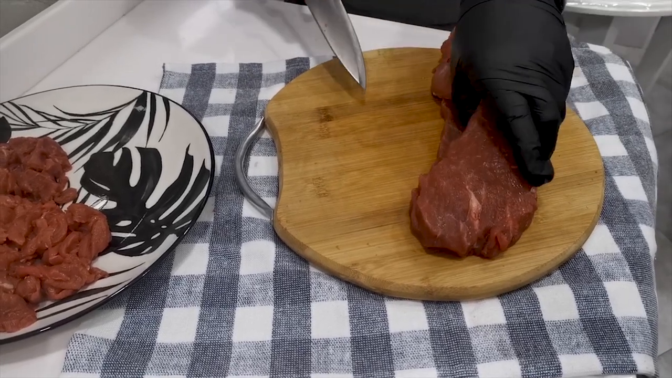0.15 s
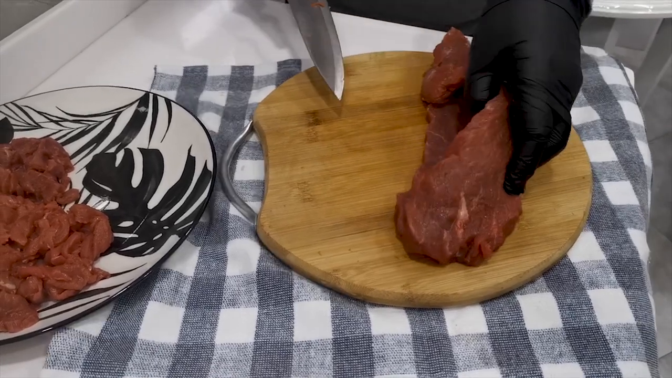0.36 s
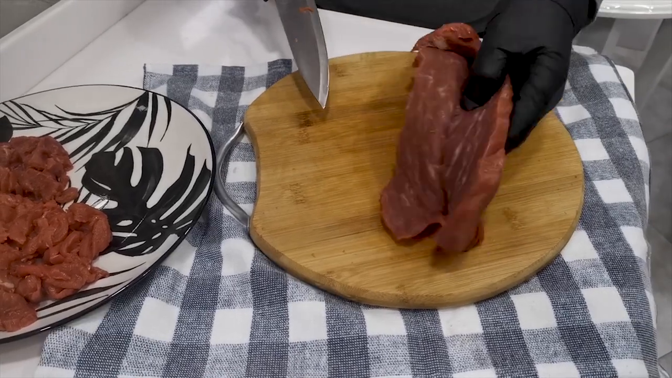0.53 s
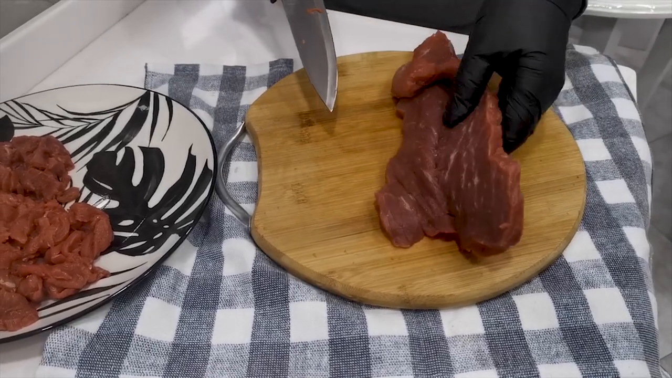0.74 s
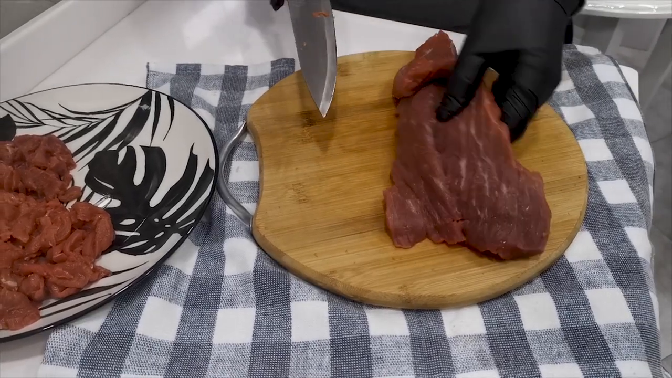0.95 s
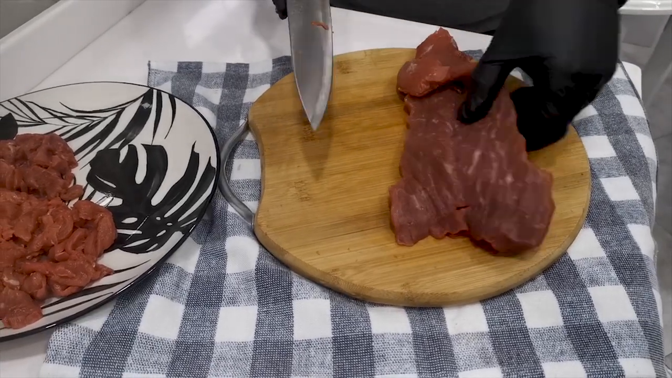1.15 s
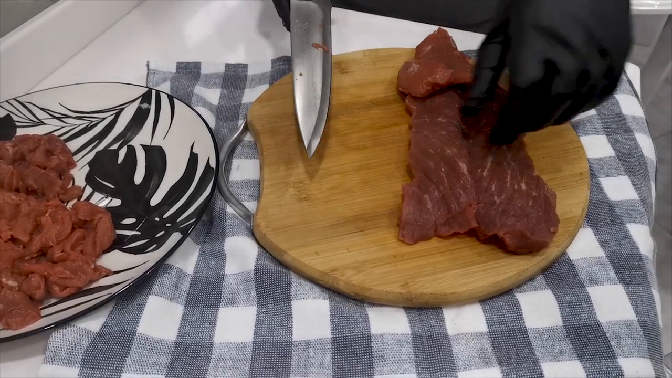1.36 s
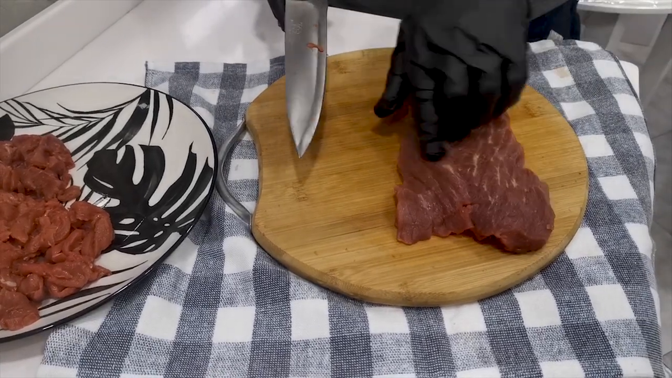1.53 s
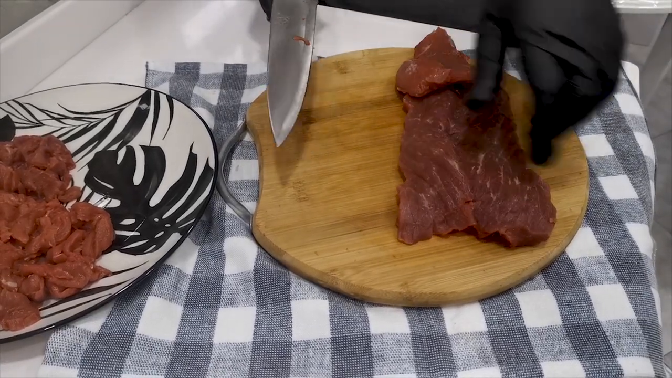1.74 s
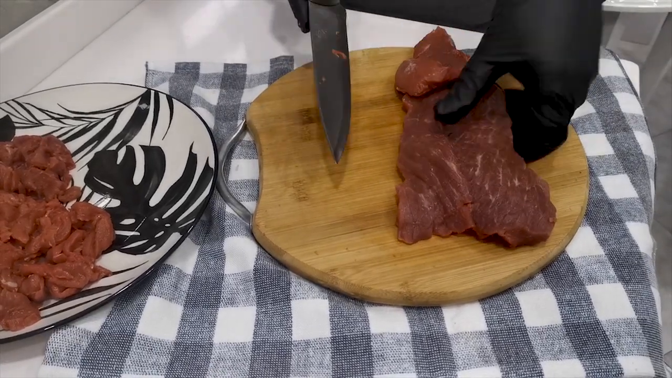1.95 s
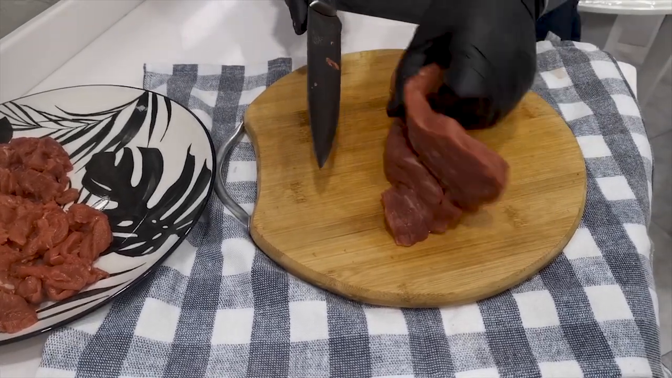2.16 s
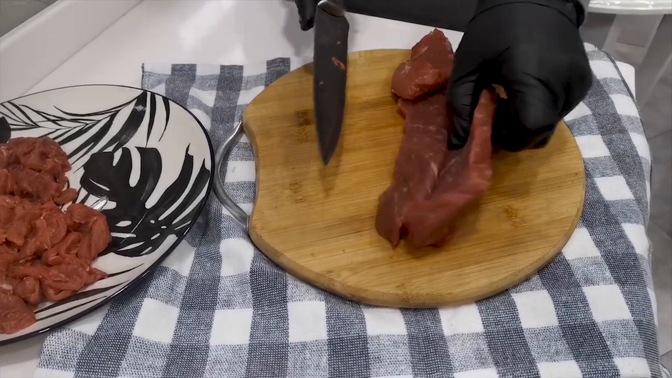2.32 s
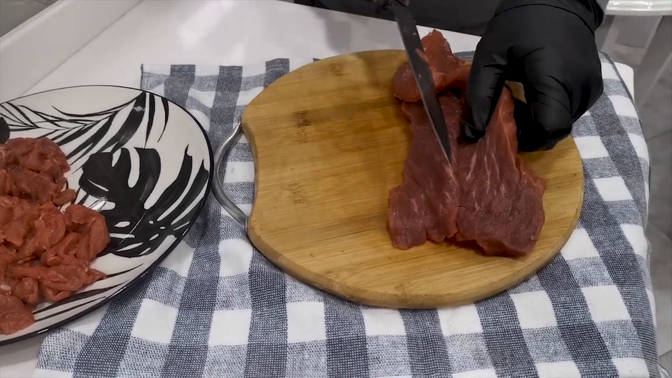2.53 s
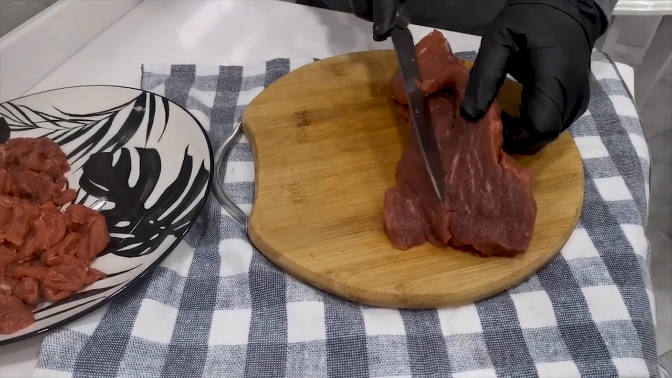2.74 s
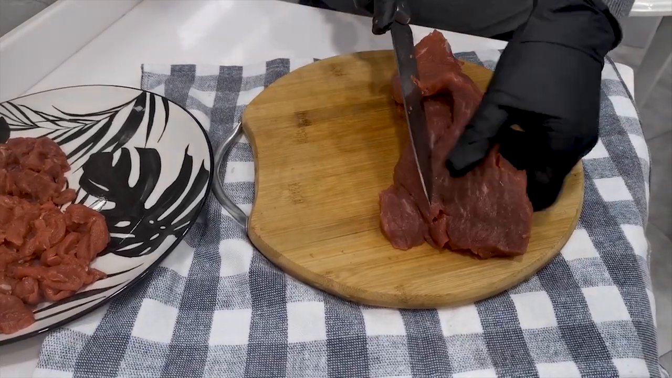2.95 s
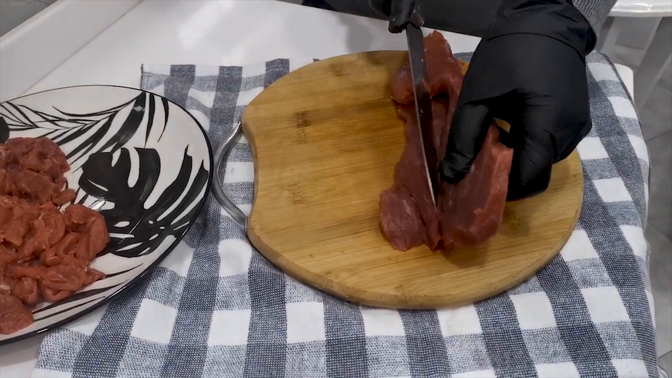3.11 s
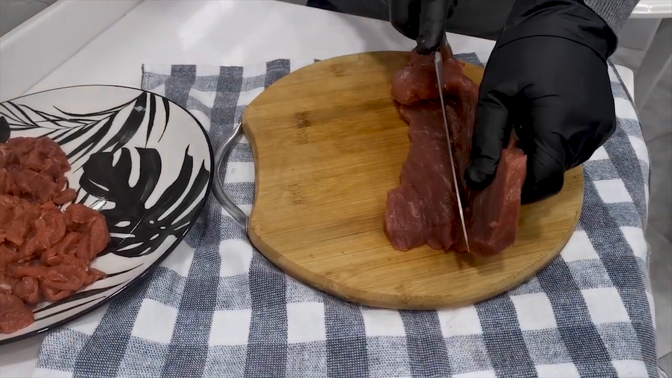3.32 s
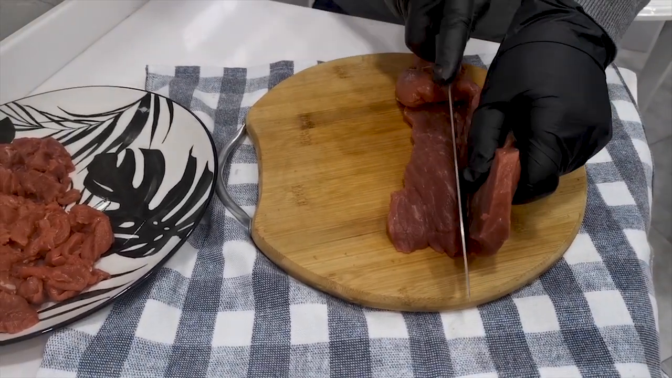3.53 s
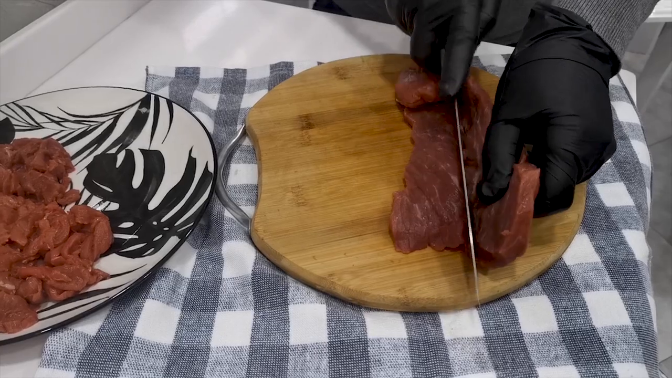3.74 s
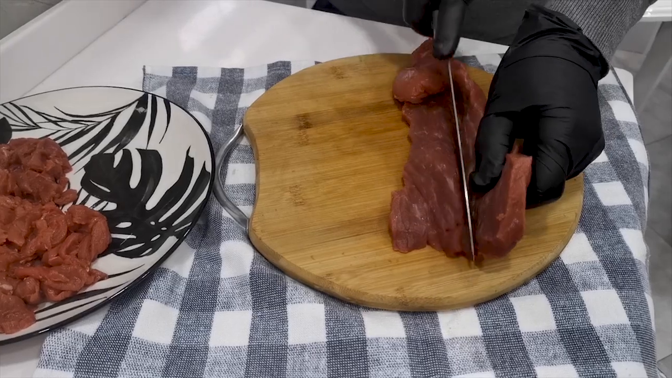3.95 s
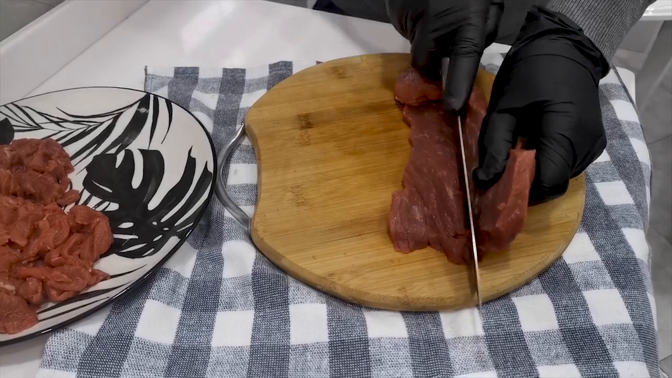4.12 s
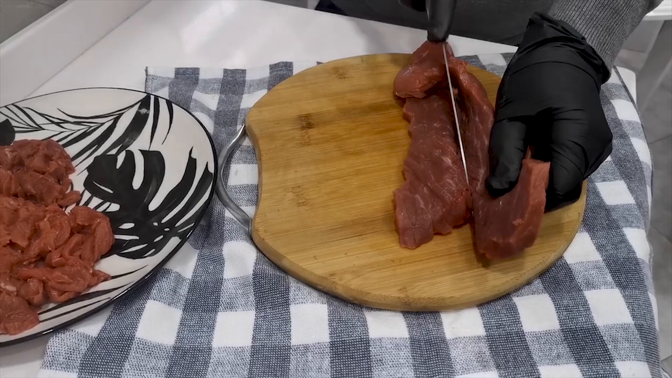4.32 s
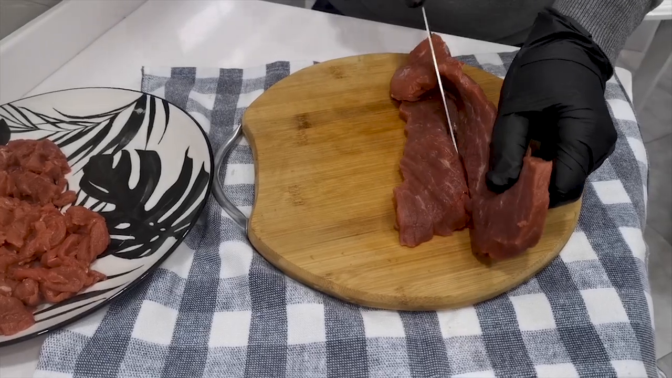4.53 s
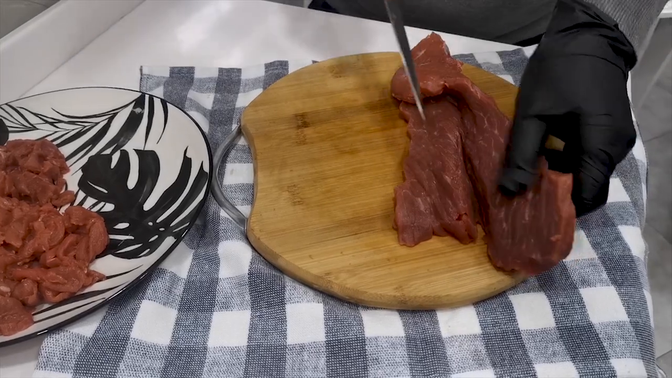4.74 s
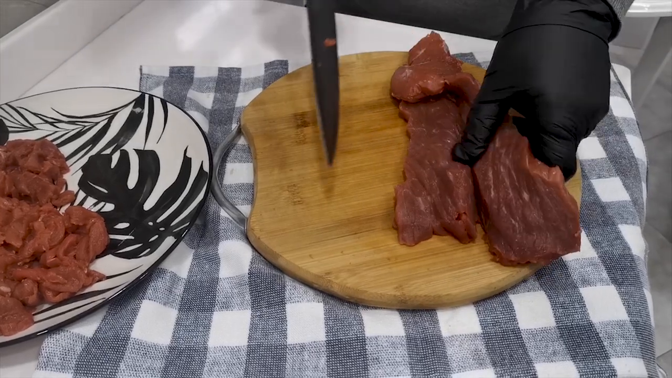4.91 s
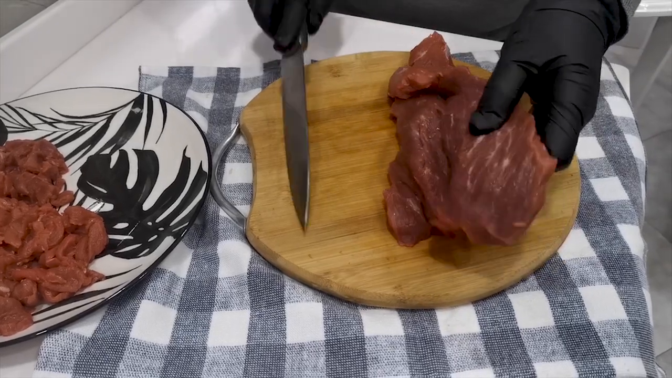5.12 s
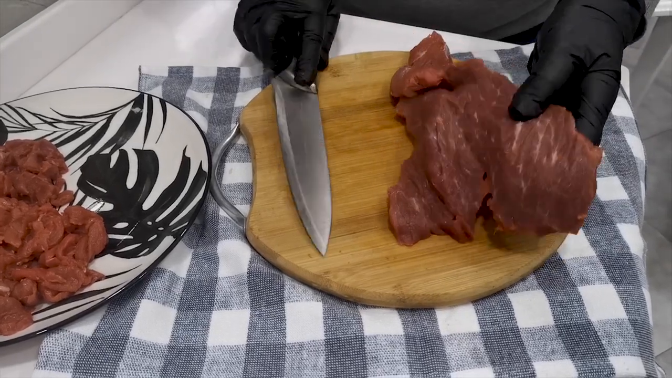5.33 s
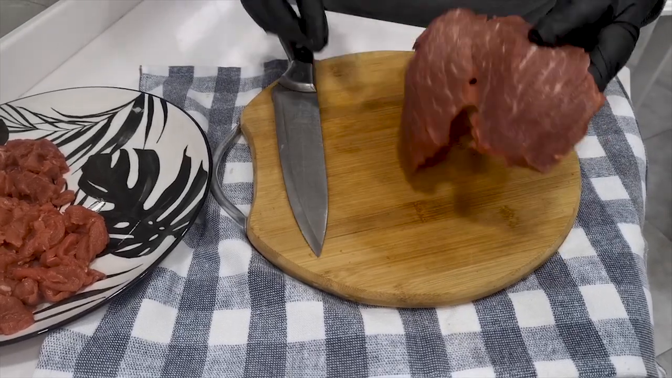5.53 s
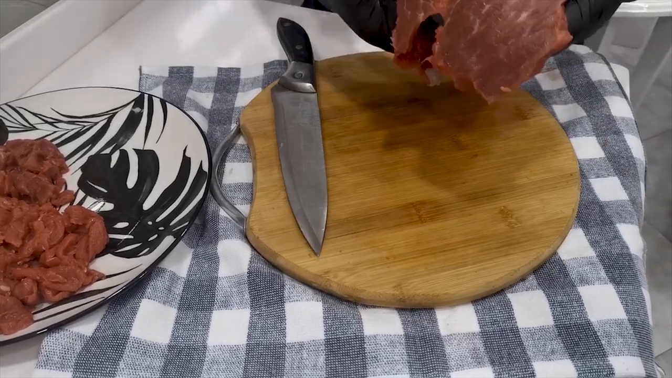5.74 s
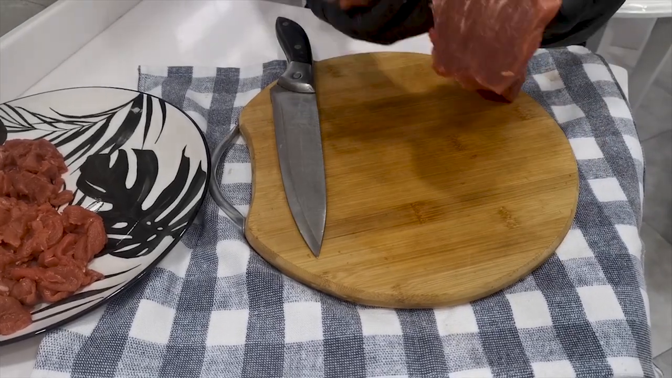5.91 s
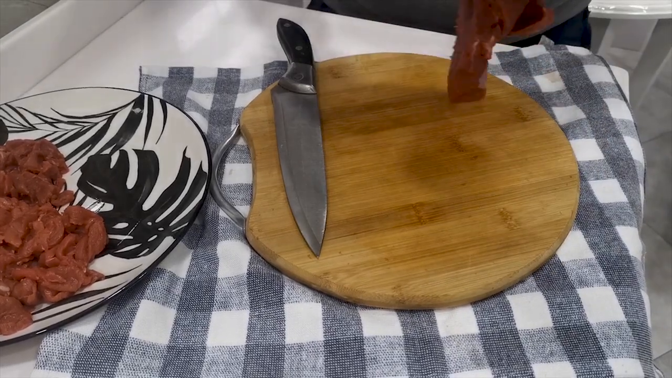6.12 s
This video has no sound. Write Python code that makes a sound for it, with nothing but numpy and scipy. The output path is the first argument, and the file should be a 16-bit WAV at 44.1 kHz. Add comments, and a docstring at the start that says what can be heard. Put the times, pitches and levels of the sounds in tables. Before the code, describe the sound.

A small, lightly echoing kitchen, heard close up in stereo over a very faint low hum and a distant blurred appliance drone. From 0 to 2.3 seconds gloved hands turn a slab of raw meat: wet squelches, tiny sticky pops and crackly glove rustle, with soft dull bumps on the board near 0.5, 0.7 and 1.9. It thins into a lull, broken by a brief moist squeeze around 3.0. Two very soft, airy blade strokes pass near 3.6 and 3.9, then the slab slaps down dully at 4.15, with a lighter bump at 4.3. Sticky peeling pops gather around 4.9 to 5.15. At 5.24 the blade hits the wood with a loud, sharp clack and short metallic ring; at 5.42 the knife lands with a cluster of hard knocks, rattling and settling by 5.7. Quiet glove rustle and wet squelches continue to about 6.2.

```python
"""Gloved hands turn and slice a slab of raw meat on a wooden board, over a faint kitchen hum and a distant drone.
First wet flesh squelches and pops (tiny damped sines) while the gloves rustle and the slab rubs (shaped noise).
After a lull the blade draws through the meat in two soft strokes of noise, and the slab slaps down.
Then the blade taps the board, and the knife is laid down, rocks (fading noise) and settles.
Blows are sums of fading tones from board and blade with an echo of the room; the counter booms below."""
import sys
import numpy as np
from scipy import signal
from scipy.fft import rfft, irfft, next_fast_len
from scipy.io import wavfile
from scipy.ndimage import uniform_filter1d, map_coordinates

SR = 44100
rng = np.random.default_rng(int(sys.argv[2]) if len(sys.argv) > 2 else 0)


def unload_audio(sound):
    """Save the sound as a 16-bit wav file, at the path given as the first command line argument."""
    columns = np.transpose(np.atleast_2d(sound))
    # keep every value between -1 and 1, then stretch to whole-number steps
    steps = np.round(np.clip(columns, -1, 1) * 32767)
    wavfile.write(sys.argv[1], SR, steps.astype(np.int16))


N = 272097  # length in samples, about 6.2 seconds

# Faint kitchen hum. Each row: frequency in Hz, relative level in dB.
HUM = [(15, -31.5), (25, -3), (101, -1), (231, -8.5), (397, -8), (463, -11), (555, -5), (797, -19.5),
       (979, -21.5), (1060, -23.5), (2750, -18), (4270, -27.5), (6620, -25.5), (12000, -55), (15600, -80),
       (22000, -120)]
# How long the kitchen echoes. Each row: frequency in Hz, time to fall by 60 dB in seconds.
KITCHEN_FADE = [(100, 0.93), (500, 0.66), (1500, 0.36), (3000, 0.5), (8000, 0.54)]
# Thuds into the counter. Each row: start in seconds, level in dB, favoured pitch in Hz.
THUDS = [(0.231, -61, 64), (0.477, -58, 64), (0.666, -44, 110), (1.115, -60, 70), (1.314, -49, 71),
         (1.906, -42, 85), (4.143, -45, 72), (4.315, -43, 78), (4.838, -57, 85), (5.239, -42, 69),
         (5.42, -39.5, 80), (5.501, -42, 90), (5.68, -55, 70), (5.989, -54.5, 32), (6.079, -50.5, 33)]
# Tones of the counter. Each row: frequency in Hz, relative level in dB, time to fall by 60 dB in seconds.
COUNTER_TONES = [(32, -2, .5), (66, -2, .25), (77, -1, .36), (95, -9, .25), (130, 3.5, .46), (175, -3, .4)]
# Chatter of the knife on the wood. Each row: frequency in Hz, relative level in dB.
RATTLE = [(40, -40), (150, -9), (300, -7.5), (600, 0), (780, -2.5), (1000, -0.5), (1450, -5), (1900, -8),
          (2300, -5.5), (2740, -5.5), (3300, -27), (4400, -42), (7000, -38), (10000, -79)]
# Blows on the board. Each row: start in seconds, level in dB, favoured pitch in Hz,
# narrowness in dB lost per squared octave, blade ring in dB added to the level, room echo in dB against the knock.
BLOWS = [(0.478, -38.5, 1010, 8, -24, 3), (0.663, -29.5, 460, 22, -40, -3.5),
         (1.907, -28, 374, 16, -40, -6), (1.922, -35, 397, 12, -30, -8), (4.145, -22.5, 470, 5, -42, 0),
         (4.1465, -27.5, 820, 23, -40, -3), (4.151, -45, 370, 14, -43, -2),
         (4.284, -35.5, 850, 21, -40, -3), (5.2391, -6, 1100, 3.5, -5.5, -5),
         (5.294, -31, 3000, 7, -28.5, 5), (5.4157, -8, 1970, 3, -42, -8), (5.432, -19.5, 2000, 1, -20, -5),
         (5.4677, -15.5, 2200, 3, -33.5, -9), (5.4829, -20, 1510, 7, -18, -11),
         (5.49, -24, 448, 4.5, -28, -4.5), (5.519, -32, 805, 4, -27, -15), (5.647, -31, 1880, 21, -26, -9)]
# Tones of the wooden board. Each row: frequency in Hz, relative level in dB, time to fall by 60 dB in seconds.
BOARD_TONES = [(306, -11, 0.026), (384, -4.5, 0.041), (467, -7, 0.05), (547, 1.5, 0.038), (654, -8, 0.024),
               (794, -2, 0.016), (942, -4.5, 0.024), (1038, -1.5, 0.015), (1477, -20.5, 0.03),
               (1852, 3, 0.02), (2150, 3.5, .012), (2680, 2, 0.019), (3160, -19, 0.004), (3690, -15, 0.028),
               (4500, -16.5, 0.013), (5800, -32.5, .008), (7000, -34, 0.0098)]
# Tones of the blade. Each row: frequency in Hz, relative level in dB, time to fall by 60 dB in seconds.
BLADE_TONES = [(524, -11, .6), (602, -16, 0.96), (1040, -11, 0.53), (1140, -11, 0.43), (1121, -5, 0.52),
               (1194, -8, 0.22), (1250, -16, 0.51), (1345, -16, 0.52), (1405, -17, 0.26), (1900, -24.5, .2),
               (2700, -17, 0.34)]
# Overall tone of the blows: strongest in the middle, weak below 120 Hz and above 6500 Hz.
# Each row: frequency in Hz, gain in dB.
BLOW_TONE = [(40, -50), (120, -18.5), (260, -6), (400, -1), (4000, 3.5), (6500, -8), (10000, -35),
             (15000, -80)]
# Knife strokes. Each row: time of full speed in seconds, seconds to climb 20 dB, seconds held,
# blade drag in dB, edge hiss in dB.
STROKES = [(3.6, .2, .14, -72, -78), (3.875, .06, .08, -85, -75)]
# Rasp of the blade in the fibres. Each row: frequency in Hz, relative level in dB.
DRAG = [(1200, -60), (1800, -23), (2500, 0), (3300, 7), (4200, 4), (4900, -30.5), (6500, -70)]
# Thin hiss of the edge. Each row: frequency in Hz, relative level in dB.
EDGE = [(4000, -60), (5600, -20), (6400, -15), (6700, -1.5), (7000, -6), (7600, -6), (8400, -20),
        (12500, -50), (15000, -80)]
# Sticky pops. Each row: start in seconds, tick level in dB, pitch in Hz, treble snap level in dB.
POPS = [(0.0284, -46, 1880, -55), (0.1261, -47, 2030, -64), (0.1974, -52, 1530, -61),
        (0.2094, -42, 2890, -55), (0.2354, -46, 2900, -56), (0.2423, -43, 2080, -60),
        (0.2783, -46, 2800, -62), (0.3284, -47, 2950, -58), (0.4834, -38, 1530, -56),
        (0.5634, -52, 1550, -53), (0.6115, -50, 1950, -67), (0.6305, -43, 1830, -57),
        (0.6674, -38, 2040, -57), (0.7344, -46, 1530, -53), (0.7652, -45, 1870, -67),
        (0.9318, -42, 1740, -72), (0.9453, -40, 1200, -66), (1.1074, -41, 1840, -62),
        (1.1464, -36, 2220, -58), (1.1598, -32, 3230, -59), (1.1927, -39, 3110, -58),
        (1.495, -41, 2730, -51), (1.5085, -35, 2730, -54), (1.5599, -42, 2730, -52),
        (1.6053, -41, 1670, -58), (1.6661, -32, 1720, -47), (1.6984, -48, 1800, -46),
        (1.7304, -49, 2020, -52), (1.8282, -50, 2810, -51), (2.0657, -42, 2750, -61),
        (2.0981, -38, 1890, -56), (2.1554, -42, 2120, -50), (2.1949, -39, 2130, -44),
        (2.2593, -43, 1690, -60), (2.3486, -45, 2220, -71), (2.4723, -54, 2060, -71),
        (2.4064, -60, 2080, -58), (2.5284, -63, 1620, -62), (2.6419, -60, 1960, -62),
        (2.7424, -57, 2770, -62), (2.821, -49, 2620, -64), (2.9444, -49, 2090, -62),
        (3.022, -41, 1400, -49), (3.2311, -57, 1980, -67), (3.477, -54, 3070, -64),
        (3.7509, -51, 3320, -72), (4.0741, -48, 1950, -65), (4.1294, -50, 1990, -56),
        (4.6887, -50, 2050, -68), (4.7686, -47, 2060, -63), (4.8254, -48, 2310, -60),
        (4.8574, -48, 2110, -57), (4.8988, -32, 2080, -53), (4.9144, -38, 2160, -55),
        (5.0254, -45, 1670, -63), (5.1487, -38, 1880, -61), (5.6694, -47, 1620, -58),
        (5.7688, -48, 2240, -52), (5.8274, -59, 2620, -58), (5.9848, -51, 2140, -50)]
# Squeezes of the hands. Each row: peak time in seconds, seconds to climb 20 dB, seconds to fall by 60 dB,
# squelch in dB, favoured pocket pitch in Hz, glove rustle in dB, board rub in dB.
SQUEEZES = [(0.041, 0.077, 0.54, -60.5, 2780.0, -61.5, -62.0),
            (0.21, 0.032, 0.42, -59.0, 1310.0, -66.5, -62.0),
            (0.333, 0.242, 0.41, -56.5, 3490.0, -62.0, -76.0),
            (0.418, 0.855, 0.27, -66.5, 1870.0, -90.0, -76.0),
            (0.481, 0.025, 0.33, -52.5, 2540.0, -59.0, -55.0),
            (0.512, 0.051, 0.43, -53.0, 1110.0, -59.0, -64.0),
            (0.666, 0.06, 0.47, -51.5, 1820.0, -59.0, -76.0),
            (0.82, 0.079, 0.18, -58.0, 1870.0, -75.5, -76.0),
            (0.956, 0.033, 0.28, -50.5, 990.0, -86.0, -76.0),
            (1.002, 0.395, 0.22, -59.5, 1810.0, -70.5, -76.0),
            (1.119, 0.031, 0.46, -52.0, 1830.0, -63.5, -76.0),
            (1.142, 0.036, 0.42, -48.0, 3430.0, -75.0, -61.0),
            (1.193, 0.103, 0.48, -54.5, 1320.0, -57.0, -76.0),
            (1.259, 0.162, 0.28, -55.0, 2970.0, -63.5, -76.0),
            (1.314, 0.031, 0.21, -57.0, 1050.0, -51.0, -66.0),
            (1.5, 0.017, 0.27, -52.0, 1830.0, -55.0, -63.0),
            (1.57, 0.037, 0.63, -56.5, 1970.0, -60.5, -76.0),
            (1.667, 0.064, 0.5, -55.5, 1650.0, -59.5, -76.0),
            (1.734, 0.027, 1.44, -68.0, 2490.0, -64.5, -76.0),
            (1.909, 0.013, 0.42, -56.0, 1610.0, -53.5, -76.0),
            (2.029, 0.081, 0.7, -53.0, 2380.0, -62.5, -65.0),
            (2.142, 0.113, 0.22, -49.5, 1570.0, -82.5, -76.0),
            (2.18, 0.184, 0.63, -61.5, 2180.0, -60.0, -76.0),
            (2.254, 0.018, 1.13, -66.5, 1600.0, -68.5, -76.0),
            (2.342, 0.015, 0.28, -67.0, 2030.0, -90.0, -76.0),
            (2.768, 0.044, 0.39, -72.0, 2010.0, -70.5, -76.0),
            (2.826, 0.022, 1.23, -62.5, 2680.0, -90.0, -76.0),
            (2.869, 0.06, 0.43, -56.0, 1610.0, -62.0, -68.0),
            (3.035, 0.062, 0.45, -53.0, 1510.0, -60.0, -76.0),
            (3.235, 0.016, 1.43, -74.0, 1660.0, -80.0, -76.0),
            (3.483, 0.045, 0.17, -76.0, 1580.0, -74.0, -76.0),
            (3.627, 0.191, 0.62, -68.5, 2250.0, -70.0, -76.0),
            (3.885, 0.048, 0.23, -76.5, 1400.0, -65.5, -76.0),
            (4.079, 0.015, 0.65, -63.0, 1750.0, -64.5, -76.0),
            (4.157, 0.033, 0.25, -48.5, 1510.0, -58.0, -50.0),
            (4.294, 0.117, 0.59, -54.5, 1940.0, -61.0, -55.0),
            (4.44, 0.202, 0.4, -63.0, 3320.0, -67.0, -64.0),
            (4.674, 0.062, 0.8, -70.5, 1750.0, -71.5, -76.0),
            (4.748, 0.054, 4.61, -65.0, 2220.0, -68.0, -76.0),
            (4.915, 0.07, 0.38, -51.5, 2370.0, -58.0, -69.0),
            (5.076, 0.563, 0.22, -59.5, 1520.0, -70.5, -76.0),
            (5.152, 0.17, 0.48, -51.0, 1360.0, -63.5, -66.0),
            (5.292, 0.158, 0.49, -87.5, 1990.0, -61.5, -76.0),
            (5.44, 0.043, 0.36, -85.0, 2050.0, -58.0, -76.0),
            (5.713, 0.155, 0.41, -77.5, 2220.0, -62.5, -57.0),
            (5.776, 0.036, 0.17, -71.5, 2320.0, -58.5, -70.0),
            (5.899, 0.169, 0.35, -64.5, 1090.0, -67.5, -76.0),
            (5.991, 0.051, 0.66, -59.5, 1990.0, -65.0, -76.0),
            (6.055, 0.126, 0.17, -55.5, 2250.0, -51.5, -69.0),
            (6.169, 0.993, 2.0, -69.5, 3720.0, -73.5, -76.0)]
# Air pockets in the wet flesh. Each row: pitch in Hz, scatter of pitch (natural log), cycles of ring.
POCKETS = [(1346, 0.15, 3.6), (1983, 0.11, 6.5), (2790, 0.12, 9.7)]
# Tone of wet flesh. Each row: frequency in Hz, relative level in dB.
WET = [(500, -60), (900, -14), (1200, -9), (3200, 6), (3800, 2.5), (4600, -16), (8000, -60)]
# Tone of the gloves. Each row: frequency in Hz, relative level in dB.
GLOVE = [(2350, -12), (4000, -4), (4580, -7.5), (5210, -2), (6800, -0.5), (7650, -5.5), (9750, -21),
         (13200, -29), (15400, -53)]
# Tone of the slab rubbing on the board. Each row: frequency in Hz, relative level in dB.
RUB = [(88, -22), (150, -4), (377, 3), (642, -10), (823, -7.5), (900, -5.5), (1170, -3), (1980, -120)]
# Two microphone ports. Each row: frequency in Hz, share of the side in step with the mid,
# share a quarter cycle ahead, unrelated side in dB.
PORTS = [(60.0, 0.28, -0.02, -15), (140.0, 0.29, -0.03, -17), (280.0, 0.22, -0.11, -14),
         (570.0, 0.17, -0.06, -16), (1060.0, 0.18, -0.06, -12), (1670.0, -0.04, -0.19, -10),
         (2370.0, -0.24, -0.05, -10), (3170.0, -0.3, -0.03, -7), (3980.0, -0.02, 0.79, 3),
         (4920.0, 1.26, 0.29, 0), (6200.0, 0.65, 0.02, -2), (7940.0, 0.65, -0.03, 0),
         (10390.0, 0.07, -0.07, -1), (13420.0, 0.1, 0.01, -4)]

HUM_DB = -69.5  # the hum wavers around this
ROCK_START_S, ROCK_STILL_S = 5.42, 5.67  # the knife lands flat, and lies still
ROCK_DB, ROCK_LANDING_S = -31, .002
ROCK_FADE_DB_PER_S, STILL_FADE_DB_PER_S = 85, 280  # the second adds to the first
STROKE_T60_S = .2  # time for a stroke to fall by 60 dB
FAINT_POP_DB, FAINT_POP_HZ, FAINT_TREBLE_DB = -60, 2100, -68  # centres of the random small pops
POCKET_CHOICE_DB = 16  # loss per squared octave between a pocket and the pitch of the squeeze
RESTING_RUB_DB = -80
TOP_HZ = 15500


def amp(db):
    """Turn decibels into gain."""
    return 10 ** (np.asarray(db) / 20)


def unit(x):
    """Scale a sound to an average (rms) strength of 1."""
    return x / np.sqrt(np.mean(x ** 2, axis=-1, keepdims=True) + 1e-20)


def along(points, hz, axis=1):
    """Read one column of a table between its rows, on a log frequency scale."""
    rows = np.transpose(points)
    return np.interp(np.log(hz + 1), np.log(rows[0] + 1), rows[axis])


def wobble(rate):
    """A smooth random curve with this many random points a second."""
    knots = rng.standard_normal(int(N * rate / SR) + 4)
    return map_coordinates(knots, [np.arange(N) * rate / SR])


def filtered(x, response):
    """Multiply the spectrum of a sound by a response to frequency."""
    m = next_fast_len(N + SR // 2)
    return irfft(rfft(x, m) * response(np.fft.rfftfreq(m, 1 / SR)), m)[..., :N]


def coloured(x, spectrum):
    """Shape a sound by (Hz, dB) rows, then scale it to rms 1."""
    return unit(filtered(x, lambda hz: amp(along(spectrum, hz))))


def add(track, s, sound):
    """Mix a sound into a track, starting at s seconds."""
    part = track[round(s * SR):][:len(sound)]
    part += sound[:len(part)]


def tail(t60s, size):
    """An echo: noise of energy 1 whose every frequency dies at its own speed."""
    hz, t, z = signal.stft(rng.standard_normal(size), SR, nperseg=256)
    fade = amp(-60 * t / along(t60s, hz)[:, None])
    x = signal.istft(z * fade, SR, nperseg=256)[1]
    return x / np.linalg.norm(x)


def swell(size, attack):
    """A quick rise from silence; attack is its time constant in seconds."""
    return 1 - np.exp(-np.arange(size) / SR / attack)


def ring(modes, size, centre_hz, narrow_db, waver):
    """Fading tones of a struck body, favouring those near one pitch; loose contact blurs their phase."""
    hz, db, t60 = np.transpose(modes)[..., None]
    t = np.arange(size) / SR
    jitter = uniform_filter1d(rng.standard_normal((len(modes), size)), size=40, axis=1)
    drift = waver * np.cumsum(jitter, axis=1)
    db = db - narrow_db * np.log2(hz / centre_hz) ** 2
    db = db + 0.4 * rng.standard_normal(db.shape)  # no two hits are quite alike
    return np.sum(amp(db - 60 * t / t60) * np.sin(2 * np.pi * hz * t + drift), axis=0)


def grains(hz, cycles, spread, spike_db, count):
    """Tiny damped sines scattered around a pitch; a few are stronger than the rest."""
    when, tune, size = rng.random(count), rng.standard_normal(count), rng.standard_normal(count)
    start = (when * (N - 1)).astype(int)
    k = np.arange(int(4 * cycles * SR / hz))
    turns = (hz * np.exp(spread * tune))[:, None] * k / SR  # cycles since the start of each grain
    rows = amp(spike_db * size)[:, None] * np.sin(2 * np.pi * turns) * np.exp(-turns / cycles)
    places = (start[:, None] + k).ravel()
    return unit(np.bincount(places, rows.ravel(), N + len(k))[:N])


def efforts(peak_s, climb_s, hold_s, t60):
    """Power over time of gestures that climb, hold and die away: one row each, one value per 64 samples."""
    late = np.arange(0, N + 64, 64) / SR - peak_s[:, None]
    climb_db = 20 * late / climb_s[:, None]
    fall_db = -60 * np.maximum(late - hold_s, 0) / t60
    return amp(np.where(late < 0, climb_db, fall_db)) ** 2


def summed(powers, db):
    """Gain of all gestures together, each at its own level."""
    gain = np.sqrt(amp(db) ** 2 @ powers)
    return np.interp(np.arange(N) / 64, np.arange(powers.shape[1]), gain)


def kitchen_hum(hum_db):
    """Two unrelated streams of hum-shaped noise that share one slow and one quicker wavering of level."""
    level = amp(hum_db + 2.4 * wobble(2.8) + 1.0 * wobble(15))
    return level * coloured(rng.standard_normal((2, N)), HUM)


def drone():
    """A distant appliance hums on a blurred note: a narrow band of noise near 412 Hz."""
    note = [(350, -42), (390, -3.5), (412, 10.5), (435, -7), (480, -39.5)]  # Hz, dB
    return amp(-79) * coloured(rng.standard_normal(N), note)


def thuds():
    """The counter under the board gives a dull, wavering boom of low fading tones."""
    out, long = np.zeros(N), SR // 3
    for s, db, hz in THUDS:
        boom = ring(COUNTER_TONES, long, hz, narrow_db=30, waver=0.03)
        add(out, s, amp(db) * swell(long, 0.0053) * boom)
    # keep mostly what lies between 36 and 220 Hz
    return filtered(out, lambda hz: 1 / (1 + (hz / 220) ** 4) / (1 + (36 / (hz + 1)) ** 6))


def rocking():
    """The laid-down knife chatters on the wood as flickering noise, ever weaker, until it lies still."""
    t = np.arange(N) / SR
    fade_db = ROCK_FADE_DB_PER_S * (t - ROCK_START_S)
    fade_db += STILL_FADE_DB_PER_S * np.maximum(t - ROCK_STILL_S, 0)
    landing = np.clip((t - ROCK_START_S) / ROCK_LANDING_S, 0, 1) ** 2
    chatter = rng.standard_normal(N) * amp(1.85 * wobble(140))
    return landing * amp(ROCK_DB - fade_db) * coloured(chatter, RATTLE)


def blows():
    """Each blow knocks the board, rings the blade and fills the kitchen with a short echo."""
    out, short, long = np.zeros(N), SR // 16, SR // 3
    for s, db, hz, narrow_db, blade_db, room_db in BLOWS:
        knock = ring(BOARD_TONES, short, hz, narrow_db, waver=0.045)
        knock *= amp(db - 10) * swell(short, .0003)
        blade = ring(BLADE_TONES, long, hz, narrow_db, waver=0.037)
        echo = signal.fftconvolve(knock, tail(KITCHEN_FADE, size=long))
        add(out, s, knock)
        add(out, s, amp(db - 9.5 + blade_db) * blade * swell(long, 0.0039))
        add(out, s + 0.00288, amp(room_db) * echo)
    return filtered(out, lambda hz: amp(along(BLOW_TONE, hz)))


def slicing():
    """The edge draws through the fibres with an airy rasp and a thin high hiss, both flickering noise."""
    s, climb_s, hold_s, drag_db, edge_db = np.transpose(STROKES)
    powers = efforts(s, climb_s, hold_s[:, None], STROKE_T60_S)
    rasp = coloured(rng.standard_normal(N) * amp(1.5 * wobble(70)), DRAG)
    hiss = coloured(rng.standard_normal(N) * amp(2.5 * wobble(50)), EDGE)
    return summed(powers, drag_db) * rasp + summed(powers, edge_db) * hiss


def faint_pops(count):
    """Extra small pops drawn by chance, in rows like those of POPS."""
    when, (size, tune, bright) = rng.random(count), rng.standard_normal((3, count))
    pitch_hz = FAINT_POP_HZ * np.exp(.22 * tune)
    return np.transpose([when * N / SR, FAINT_POP_DB + 3 * size, pitch_hz, FAINT_TREBLE_DB + 3 * bright])


def pops():
    """Each sticky contact lets go with a pitched tick and a snap of treble, then fizzes out."""
    ticks, snaps, t = np.zeros(N), np.zeros(N), np.arange(SR // 20) / SR
    for s, db, hz, treble_db in [*POPS, *faint_pops(count=24)]:
        tick = np.sin(2 * np.pi * hz * t) + .3 * np.sin(2 * np.pi * 1.404 * hz * t)
        add(ticks, s, amp(db - 60 * t / .008) * swell(len(t), .00015) * tick)
        fade = amp(-60 * t / .005) + amp(-16 - 60 * t / .04)  # a sharp snap, then a weaker fizz
        add(snaps, s, amp(treble_db + 14) * fade * rng.standard_normal(len(t)))
    echo = tail([(1000, 0.28), (4000, 0.13)], size=4096)  # Hz, seconds to fall by 60 dB
    ticks += amp(-10) * signal.fftconvolve(ticks, echo)[:N]
    # weaken the ticks below 700 Hz
    ticks = filtered(ticks, lambda hz: (1j * hz / (700 + 1j * hz)) ** 2 * amp(1.5))
    return ticks + filtered(snaps, lambda hz: amp(along(GLOVE, hz)))


def hands():
    """Wet flesh parts in tiny sucks from three sizes of pocket; the gloves crackle and the slab drags on the wood."""
    s, climb_s, t60, squelch_db, pitch_hz, glove_db, rub_db = np.transpose(SQUEEZES)
    powers = efforts(s, climb_s, 0, t60[:, None])
    clumps = wobble(45)  # shared, so flesh and gloves flicker partly together
    out = np.zeros(N)
    for hz, spread, cycles in POCKETS:
        sucks = coloured(grains(hz, cycles, spread, spike_db=4.0, count=4200), WET)
        share = summed(powers, squelch_db - POCKET_CHOICE_DB * np.log2(hz / pitch_hz) ** 2)
        out += share * unit(amp(0.97 * clumps + 1.3 * wobble(30)) * sucks)
    crackle = grains(6300, cycles=2.0, spread=0.41, spike_db=3.5, count=9000)
    rustle = coloured(crackle + 2.1 * rng.standard_normal(N), GLOVE)
    out += summed(powers, glove_db) * unit(amp(0.96 * clumps + 2.2 * wobble(60)) * rustle)
    rub = coloured(rng.standard_normal(N), RUB)
    rub_level = np.hypot(summed(powers, rub_db), amp(RESTING_RUB_DB))
    return out + rub_level * unit(amp(2.3 * wobble(25)) * rub)


def ports(near, hum):
    """Two ports hear mid plus side and mid minus side; the side mixes shifted mid, scattered sound and other hum."""
    scattered = signal.fftconvolve(near, tail([(100, 0.13), (10000, 0.072)], size=8192))[:N]
    hum_side = [(100, -7.5), (2500, -1), (4200, -1.0), (13000, 4.0)]  # Hz, dB
    mid = near + hum[0]
    side = filtered(mid, lambda hz: along(PORTS, hz, axis=1) + 1j * along(PORTS, hz, axis=2))
    side += filtered(scattered, lambda hz: amp(along(PORTS, hz, axis=3)))
    side += filtered(hum[1], lambda hz: amp(along(hum_side, hz)))
    return np.array([mid + side, mid - side])


def scene():
    """The drone and everything near the board, heard with the hum through the two ports."""
    near = drone() + thuds() + rocking() + blows() + slicing() + pops() + hands()
    return ports(near, kitchen_hum(HUM_DB))


def record(dry):
    """Keep nothing at or above the top frequency."""
    return filtered(dry, lambda hz: hz < TOP_HZ)


dry = scene()
out = record(dry)
unload_audio(out)
```